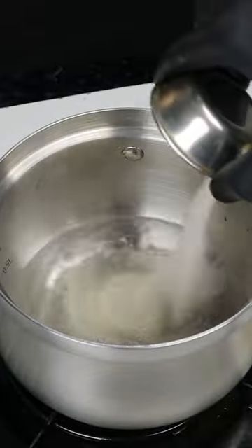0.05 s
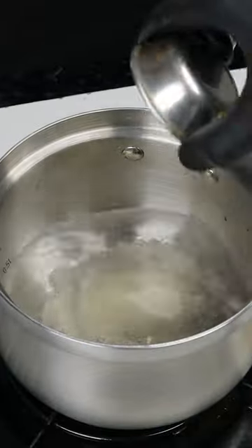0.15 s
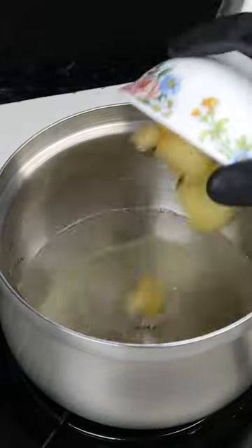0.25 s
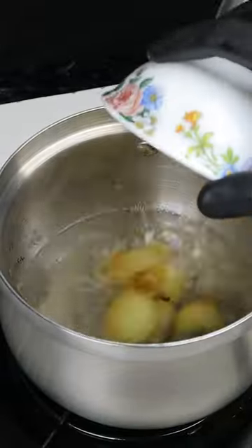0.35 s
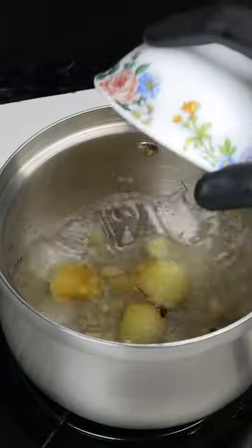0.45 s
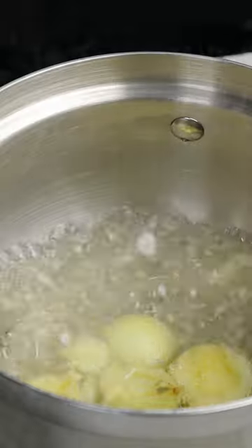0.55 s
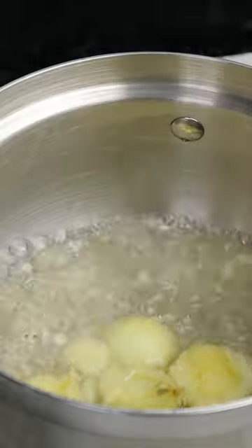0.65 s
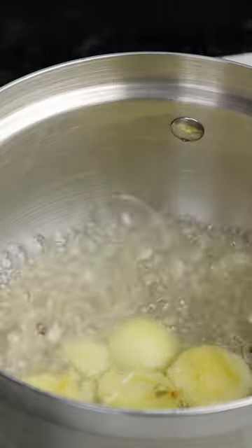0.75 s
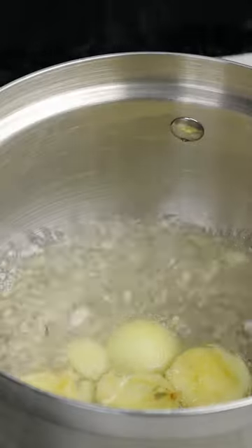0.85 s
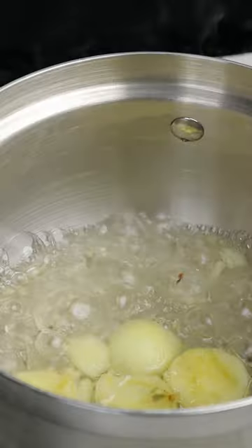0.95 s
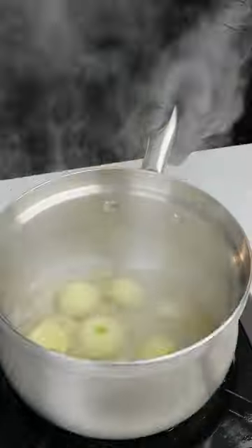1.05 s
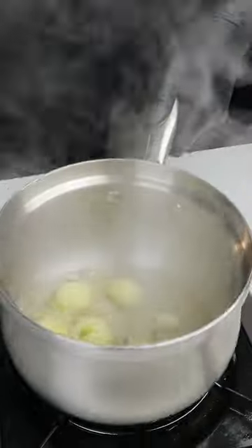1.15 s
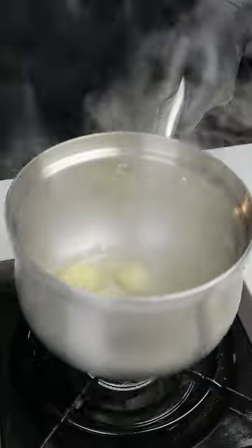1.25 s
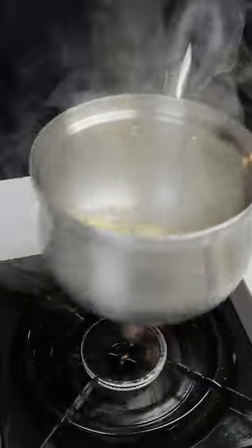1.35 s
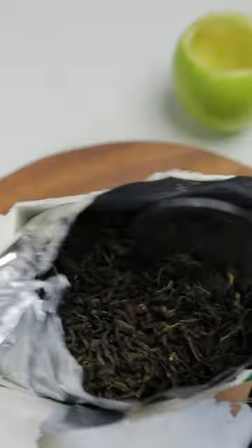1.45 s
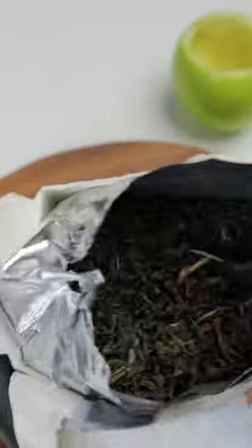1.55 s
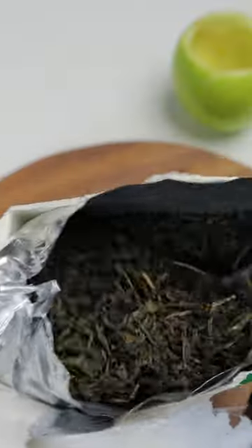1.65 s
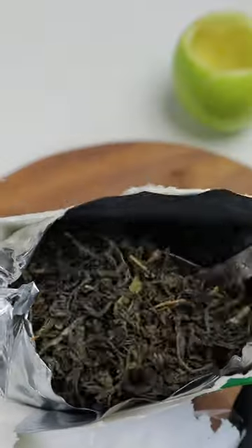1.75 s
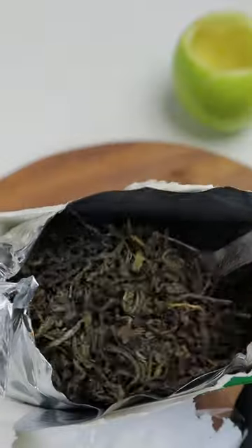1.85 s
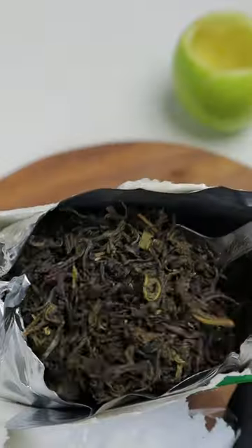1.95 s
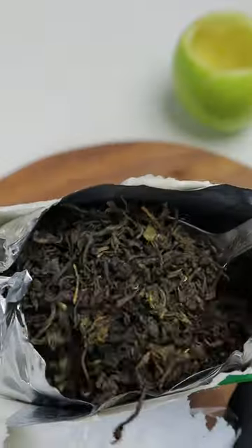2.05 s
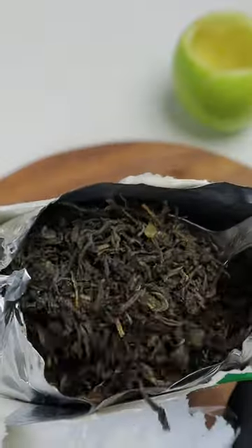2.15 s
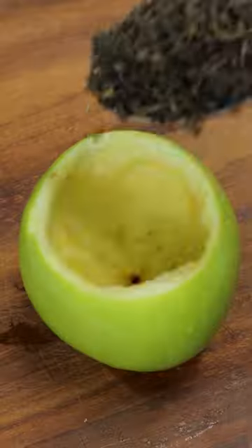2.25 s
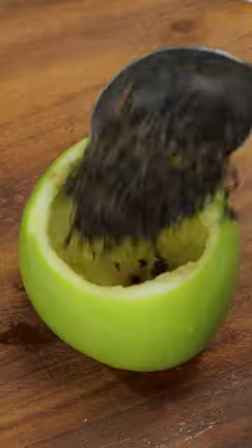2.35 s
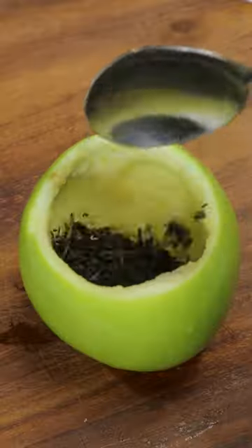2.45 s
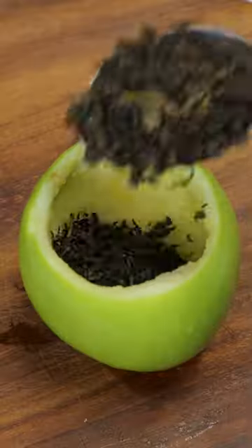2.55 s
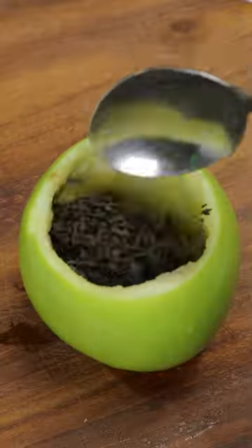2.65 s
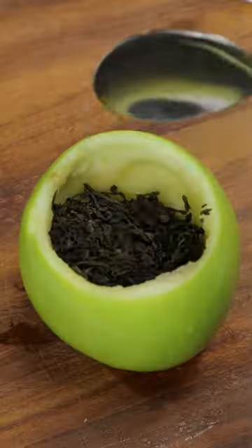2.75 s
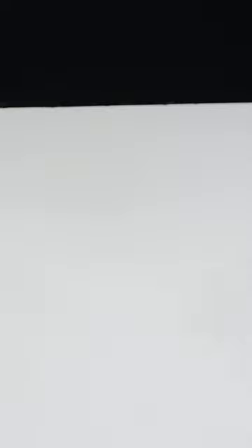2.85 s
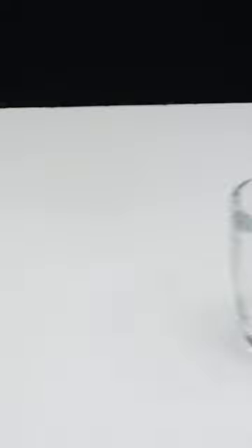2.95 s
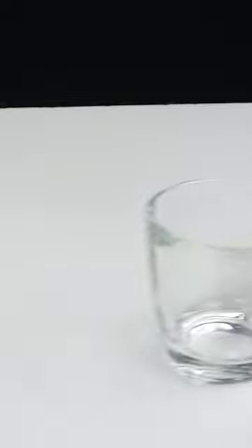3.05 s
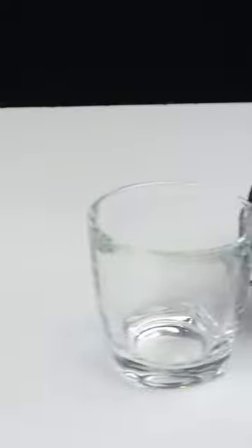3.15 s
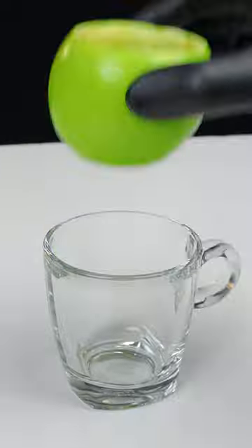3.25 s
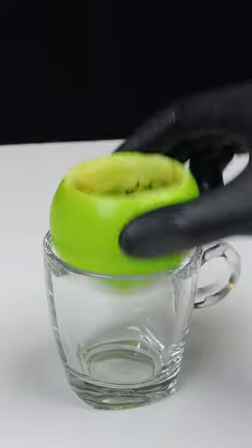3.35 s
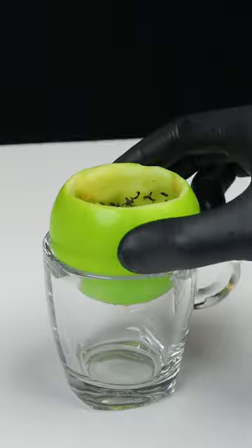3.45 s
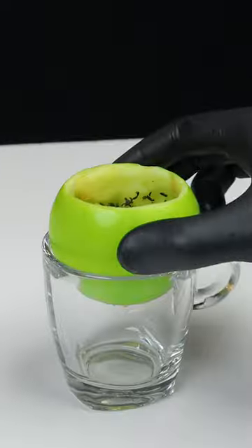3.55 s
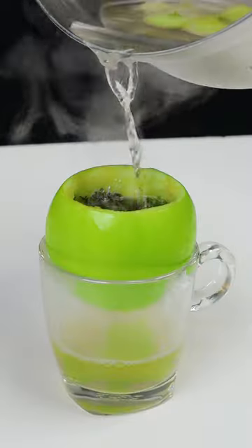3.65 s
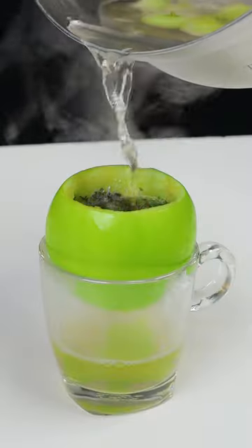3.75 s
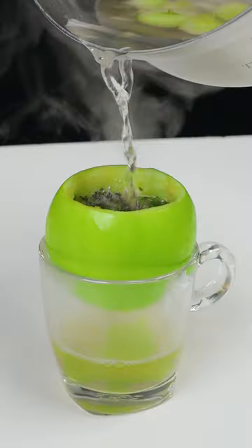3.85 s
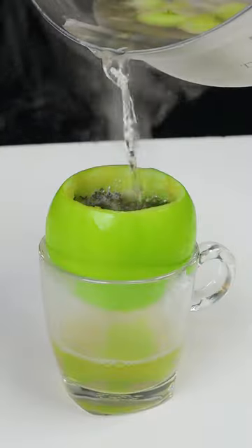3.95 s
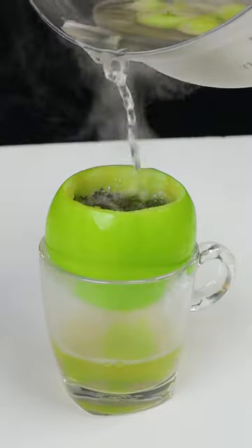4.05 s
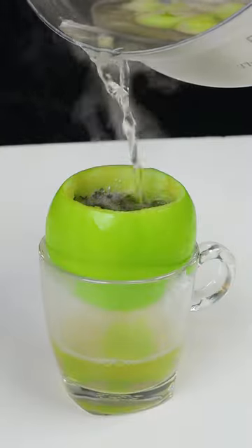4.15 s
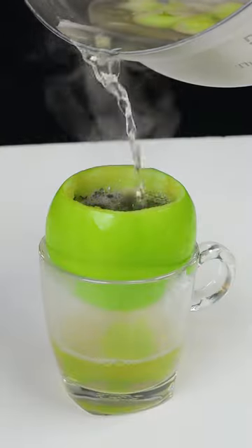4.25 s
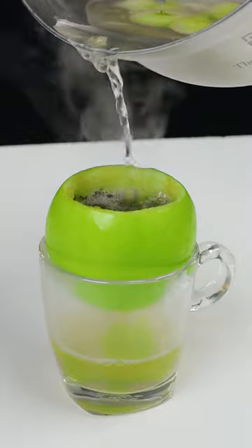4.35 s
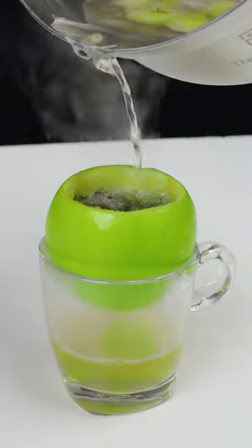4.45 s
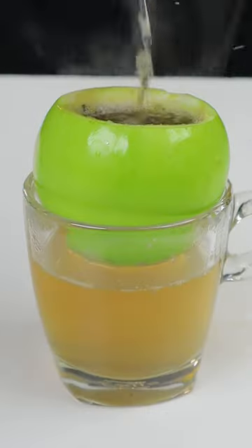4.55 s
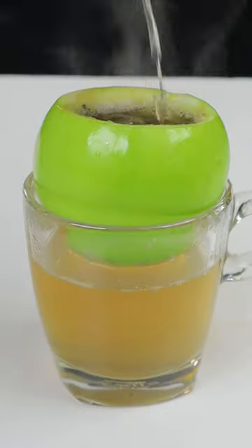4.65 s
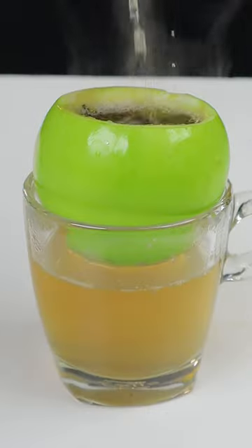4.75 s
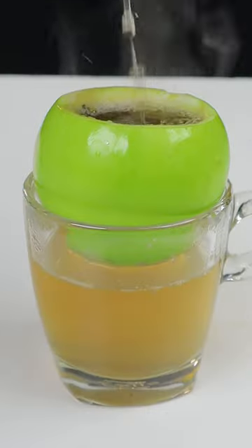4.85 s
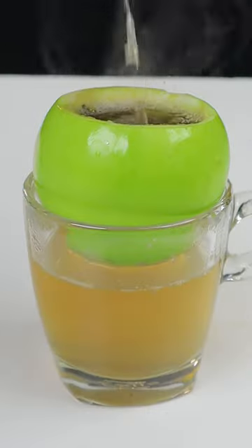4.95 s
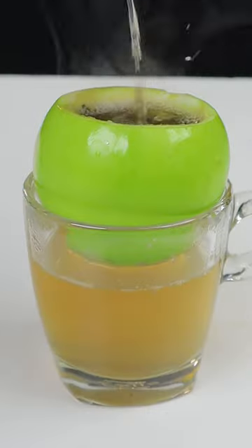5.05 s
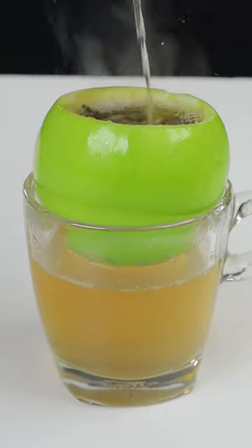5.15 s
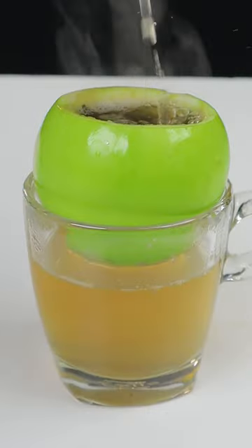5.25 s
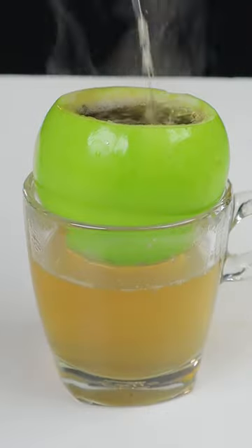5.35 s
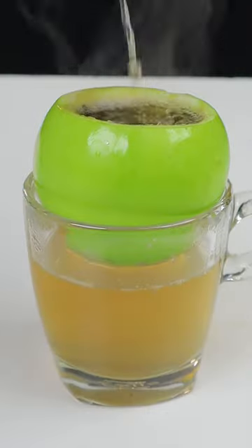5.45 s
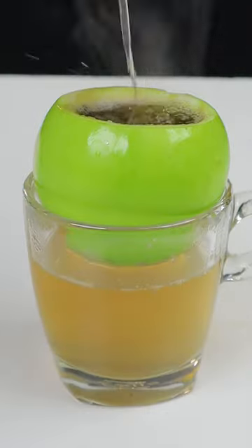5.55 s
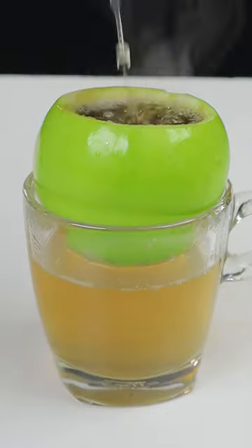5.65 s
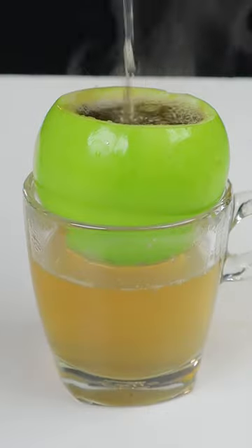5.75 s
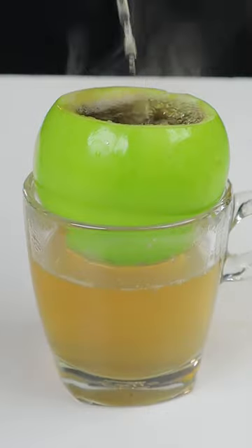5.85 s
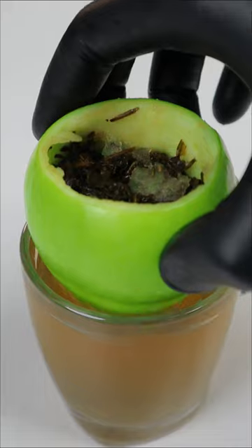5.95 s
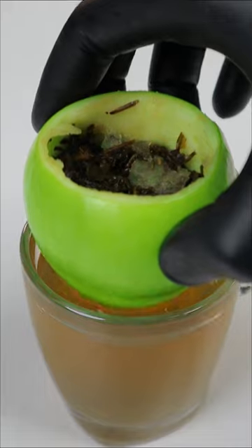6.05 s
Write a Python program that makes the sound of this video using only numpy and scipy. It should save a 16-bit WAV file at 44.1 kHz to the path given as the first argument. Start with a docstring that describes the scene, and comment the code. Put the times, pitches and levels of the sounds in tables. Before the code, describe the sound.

In a quiet kitchen, close and dry, sugar rushes into a steel pot, then fruit plunges in with a splash and low bubbling boil. The pot knocks and scrapes on the hob. Foil crumples and dry tea leaves crunch, snap and sprinkle. A glass rubs across a table, an apple lands with a hard double thud, and water patters brightly onto wet leaves until an abrupt end.

```python
"""Kitchen, close and dry, mono: tea is made in a hollowed apple.
Sugar hisses into a steel pot (dense impacts), fruit plops in, the water boils (ringing bubbles)
and the pot scrapes on the hob. A spoon crunches in a foil bag of tea and sprinkles it; a glass slides,
the apple thuds onto it (resonances), and a thin stream patters on wet leaves (drops and noise).
Every movement is a stroke: attack, hold, release."""
import sys
import numpy as np
from scipy import signal
from scipy.fft import rfft, irfft
from scipy.io import wavfile

SR = 44100
rng = np.random.default_rng(int(sys.argv[2]) if len(sys.argv) > 2 else 0)


def wav_record(signal):
    """Record a signal, one row per channel, as 16-bit PCM in the file named by sys.argv[1]."""
    frames = np.transpose(np.atleast_2d(signal))
    bounded = np.clip(frames, -1, 1)
    # unit amplitude maps onto the largest positive 16-bit level
    quanta = np.round(bounded * 32767).astype(np.int16)
    wavfile.write(sys.argv[1], SR, quanta)


N = 269142

# Stroke tables: t is the time the gain reaches full level.

# Room, output
ROOM_RMS_DB = -77.5
TOP_HZ, END_S = 15900, 5.912

# Boiling water; the gas burns until the boil ends
BOIL_S, BOIL_HOLD_S = 0.443, 0.6504
BOIL_DB, PLUNGE_DB, FIZZ_DB, FLAME_DB = -33, -16.5, -39, -47
# Spectrum of the fine fizz: f/Hz, gain/dB
FIZZ_COLOUR = [(1100, -17.5), (1550, -6.5), (1900, -9), (2900, -5), (4600, -13.5), (8500, -16.5),
               (12000, -14.5), (15500, -26)]
# Spectrum of the boiling bubbles: f/Hz, gain/dB
BOIL_COLOUR = [(30, -16.5), (71, -5), (140, -16), (280, -22), (440, -9.5), (617, -1.5), (780, -4),
               (930, -13.5), (1050, -25), (1800, -57)]
# Spectrum of the splashed spray: f/Hz, gain/dB
SPRAY_COLOUR = [(500, -14.5), (900, -12.5), (1450, -2.5), (1880, -27), (2300, -6.5), (3200, -7),
                (15500, -10.5)]
# Air bubbles ringing in the water, from small bright ticks to deep plops: t/s, level/dB, f/Hz, t60/s
PLOPS = [(.416, -10.5, 3800, 0.008), (.4205, -14, 3790, 0.029), (.438, -9, 652, 0.039),
         (.441, -9.5, 542, 0.045), (.497, -32, 640, .04), (.77, -28, 560, 0.075)]
# Splashes thrown up by the fruit: t/s, hold/s, level/dB
SPLASHES = [(.365, 0.03, -38), (.417, 0.0016, -28), (.435, 0.0056, -16.5), (.45, 0.12, -25)]

# Sugar: a rush that dies down to a thin stream
SUGAR_S, SUGAR_HOLD_S = .061, 0.211
SUGAR_RUSH_DB, SUGAR_RUSH_T60_S, SUGAR_STREAM_DB = -17.5, 0.38, -31
# Spectrum of crystals on steel: f/Hz, gain/dB
SUGAR_COLOUR = [(240, -69), (400, -42), (535, -1.5), (886, -1.5), (1030, -23), (1560, -6), (2060, -21),
                (2550, -2), (15500, 2.5)]
# Hollow notes of the pot as things slide in: t/s, hold/s, level/dB, f/Hz at t, rise/(Hz/s)
HOLLOW_NOTES = [(.082, 0.035, -41, 830, 2095.5), (0.376, 0.025, -47, 873, -600)]

# Hob grate shuddering under the pot
GRATE_S, GRATE_HOLD_S, GRATE_DB = 1.1, .04, -39
# Spectrum of the pot body: f/Hz, gain/dB
POT_COLOUR = [(35, -58), (60, -13.5), (129, -16.5), (327, -40.5), (559, -12.5), (673, -21), (1170, -10.5),
              (1590, -9), (3500, -19), (4740, -9.5), (5320, -29.5), (9740, -25.5), (15500, -36.5)]
# Pot wall modes: f/Hz, width/Hz, gain/dB
POT_MODES = [(1224, 55, 5.5), (1320, 39, 6), (1490, 51, 3.5), (1880, 47, 2), (2120, 39, 0.5),
             (2420, 60, -6), (4710, 95, 2), (6850, 93, -17), (9400, 150, -17), (10600, 80, -16)]
# Pot knocks: t/s, relative level/dB, t60/s
KNOCKS = [(1.2229, -2.5, 0.043), (1.309, -2, 0.056)]
# Shoves of the pot over the hob: t/s, hold/s, level/dB
SCRAPES = [(1.23, .015, -21.5), (1.281, 0.024, -12)]

# Time of the spoon in the bag
SPOON_IN_S, SPOON_HOLD_S = 1.7, 0.566
# Spectrum of crumpling foil: f/Hz, gain/dB
FOIL_COLOUR = [(250, -8), (650, -4.5), (1400, -6.5), (1850, 0.5), (2240, -9.5), (4240, -8), (6200, -17),
               (11600, -18), (15500, -27)]
# Spectrum of the bag's soft bulk: f/Hz, gain/dB
BULK_COLOUR = [(35, -7), (80, 5.5), (165, 2.5), (260, -12.5), (500, -22.5), (1000, -73)]
# Spectrum of the spoon in dry tea: f/Hz, gain/dB
SCOOP_COLOUR = [(500, -34), (780, -13.5), (1100, -15), (1300, -2.5), (2470, -4.5), (3500, -0.5), (5400, 1),
                (6800, -8), (11800, -9.5), (13500, -24)]
# Spectrum of falling leaves: f/Hz, gain/dB
SPRINKLE_COLOUR = [(700, -38), (1100, -30), (1300, -21), (2100, -13), (2800, -18.5), (5400, -9),
                   (15500, 1.5)]
# Foil creases and leaf stems snapping: t/s, peak level/dB, f/Hz
SNAPS = [(1.552, -26, 3000), (1.6609, -3, 10900), (1.6645, -16, 3500), (1.7551, -3, 4300),
         (2.109, -13.5, 5170), (2.224, -8, 4730)]
# Crumples of the foil bag: t/s, hold/s, level/dB
CRUMPLES = [(1.508, 0.019, -27), (1.535, 0.032, -22), (1.575, 0.027, -15), (1.601, 0.022, -8.5),
            (1.665, .001, -14.5), (1.686, 0.048, -22.5), (1.757, .012, -21)]
# Bumps against the bag's bulk: t/s, hold/s, level/dB
BUMPS = [(1.552, 0.014, -10), (1.603, 0.011, -16), (1.67, 0.022, -25.5), (1.78, 0.022, -25),
         (2.0, 0.031, -29.5)]
# Pushes of the spoon through dry tea: t/s, hold/s, level/dB
SCOOPS = [(1.7, 0.071, -21.5), (1.99, 0.12, -27.5)]
# Spoonfuls of leaves falling: t/s, hold/s, level/dB, release/s
SPOONFULS = [(2.506, 0.033, -22.5, 0.11), (2.743, 0.016, -25, .22)]

# Glass at full motion between these times; boom under the thud
GLASS_STARTS_S, GLASS_STOPS_S = 2.874, 3.303
BOOM_S, BOOM_HOLD_S, BOOM_HZ, BOOM_DB = 3.475, 0.16, 53.6, -26.5
# Spectrum of glass rubbing on the table: f/Hz, gain/dB
SLIDE_COLOUR = [(130, -15.5), (450, -14), (610, 6.5), (900, -7), (1500, -6), (4400, -12), (6700, -26),
                (11500, -24), (15000, -39)]
# Modes of the sliding glass: f/Hz, width/Hz, gain/dB
SLIDE_MODES = [(603, 52, -4.5), (1118, 33, 8), (1573, 25, 5.5), (3104, 49, -4)]
# Shoves of the glass over the table: t/s, hold/s, level/dB
SLIDES = [(2.955, 0.069, -26), (3.125, 0.031, -28.5)]
# Apple landing on the glass: t/s, level/dB
THUDS = [(3.459, -30.5), (3.4796, -2), (3.4925, -7)]
# Spectrum of the crushed flesh: f/Hz, gain/dB
THUD_COLOUR = [(100, -4.5), (200, -11), (345, -15.5), (620, 2), (920, -22.5), (1100, -16.5), (3400, -26.5),
               (13000, -57)]
# Modes of glass and table top: f/Hz, level re thud/dB, t60/s
TABLE_MODES = [(171.6, -14.5, 0.151), (572, -11.5, 0.0353), (550, -27.5, 0.28), (625, -22, 0.13),
               (1690, -32.5, .12), (2264, -29.5, .13)]

# Pour: unbroken patter, then a trickle; small drops at random between the big ones
POUR_S, PATTER_HOLD_S, PATTER_DB = 3.65, 0.69, -38.5
TRICKLE_S, TRICKLE_DB = 4.5, -49.5
DRIPS_PER_S, DRIP_DB, DRIP_SPREAD_DB = 12, -34, 13.5
DRIP_HZ, DRIP_OCTAVES, DRIP_TREBLE_DB = 2870, 1.88, -19.5
# Dying froth after each big drop of the trickle, level re drop
FROTH_DB, FROTH_T60_S = -33.5, 0.19
# Big drops on the wet leaves: t/s, level/dB, bubble f/Hz, treble setting/dB (18 dB is added)
DROPS = [(3.639, -30, 2690, -14), (3.658, -22.5, 3240, -19), (3.703, -14, 4900, -30),
         (3.732, -22, 1290, -26), (3.761, -9.5, 3440, -22.5), (3.844, -21, 3540, -44),
         (3.865, -19, 2740, -26.5), (3.916, -20.5, 3020, -31), (3.952, -16.5, 2820, -51),
         (4.082, -17, 5120, -37), (4.041, -19.5, 3450, -26), (4.096, -16.5, 3230, -27),
         (4.146, -7.5, 3370, -27.5), (4.177, -21, 1620, -22.5), (4.22, -12, 2940, -26),
         (4.227, -19, 2470, -25), (4.32, -21.5, 3280, -22), (4.371, -18, 3380, -31),
         (4.424, -20.5, 3300, -29), (4.502, -15, 3550, -13.5), (4.522, -18.5, 2960, -21),
         (4.556, -13, 2820, -11.5), (4.589, -18, 1670, -4.5), (4.637, -22, 3340, -27),
         (4.684, -16.5, 4640, -22), (4.727, -8, 4040, 2), (4.739, -17, 4740, 7), (4.764, -16, 4840, 3),
         (4.846, -11.5, 2810, -15.5), (4.861, -13.5, 1840, -19.5), (4.942, -17, 3750, -27.5),
         (5.14, -22.5, 1850, -20), (5.198, -14.5, 4870, -24), (5.224, -21.5, 1640, -19.5),
         (5.252, -7.5, 3050, -10.5), (5.274, -18.5, 1790, -26), (5.286, -11, 1690, -18),
         (5.353, -7, 1680, -6), (5.371, -14.5, 4900, -26), (5.447, -13, 5160, -23), (5.465, -15, 2870, -32),
         (5.496, -16.5, 3180, -22), (5.559, -11, 2780, -17), (5.587, -12.5, 3030, -14),
         (5.605, -19, 5050, -21), (5.656, -13.5, 1330, -5), (5.776, -9, 2120, -13),
         (5.818, -5, 2290, -20.5), (5.846, -13.5, 3000, -20), (5.878, -9.5, 5200, -10.5),
         (5.904, -23, 2630, -20.5)]
# Spectrum of the patter: f/Hz, gain/dB
PATTER_COLOUR = [(600, -3.5), (850, -2), (1050, -23), (1350, 4), (2200, -5), (3300, 3.5), (5500, 0),
                 (6900, -31), (11000, 2), (15500, -21)]
# Trapped air chirping as the apple fills: t/s, level/dB, f/Hz
GURGLES = [(4.225, -28, 2830), (4.231, -27, 1850), (4.817, -33.5, 1020), (5.039, -27.5, 2910),
           (5.289, -23.5, 1320), (5.496, -31.5, 1150), (5.438, -24, 1245), (5.661, -25, 1243),
           (5.687, -28.5, 2020), (5.779, -28, 2700)]


def amp(db):
    """Decibels to gain."""
    return 10 ** (np.asarray(db) / 20)


def unit(x):
    """Scale to rms 1."""
    return x / np.sqrt(np.mean(x ** 2))


def peak(x, db):
    """Scale to a peak level."""
    return amp(db) * x / np.abs(x).max()


def clock():
    """Time of every sample in seconds."""
    return np.arange(N) / SR


def add(out, s, x):
    """Mix x into out at time s."""
    i = int(np.clip(s * SR, 0, len(out) - 1))
    out[i:i + len(x)] += x[:len(out) - i]


def fade(t60_s):
    """Exponential decay down to -60 dB."""
    return np.exp(-np.log(1000) * np.linspace(0, 1, max(int(t60_s * SR), 8)))


def stroke(s, hold_s, attack_s, release_s):
    """Gain that climbs 60 dB in attack_s to reach 1 at time s, holds, then falls 60 dB in release_s."""
    t = clock() - s
    before = np.maximum(-t / attack_s, 0)
    after = np.maximum((t - hold_s) / release_s, 0)
    return np.exp(-np.log(1000) * np.minimum(before + after, 4))


def strokes(rows, attack_s, release_s):
    """Gain of (t/s, hold/s, level/dB) strokes; the strongest prevails."""
    gains = [amp(db) * stroke(s, hold_s, attack_s, release_s) for s, hold_s, db in rows]
    return np.max(gains, axis=0)


def colour(x, points):
    """Causal minimum-phase filter through (f/Hz, gain/dB) points, steep below the lowest."""
    hz, db = np.transpose(points)
    f = np.maximum(np.arange(2049) * SR / 4096, 1)
    gain = amp(np.interp(np.log(f), np.log(hz), db))
    gain = gain / np.sqrt(1 + (hz[0] / f / 1.3) ** 6)
    # fold the cepstrum onto positive time
    cepstrum = irfft(np.log(gain + 1e-6))
    cepstrum[1:2048] *= 2
    cepstrum[2049:] = 0
    impulse = irfft(np.exp(rfft(cepstrum)))
    return signal.fftconvolve(x, impulse)[:len(x)]


def band(x, lo_hz, hi_hz):
    """Band-pass with edges kept below Nyquist."""
    edges = np.minimum([lo_hz, hi_hz], [.4 * SR, .48 * SR])
    return signal.sosfilt(signal.butter(2, edges, "band", fs=SR, output="sos"), x)


def resonate(x, modes):
    """Sum of (f/Hz, width/Hz, gain/dB) resonances."""
    return sum(amp(db) * signal.lfilter(*signal.iirpeak(hz, hz / width_hz, SR), x)
               for hz, width_hz, db in modes)


def ring(hz, t60_s, glide=0):
    """Damped sine whose pitch rises by the fraction glide, as a bubble's does near the surface."""
    decay = fade(t60_s)
    pitch_hz = np.minimum(hz * (1 + glide * np.linspace(0, 1, len(decay))), SR / 2)
    return decay * np.sin(2 * np.pi * np.cumsum(pitch_hz) / SR)


def burst(t60_s):
    """Noise that dies away."""
    decay = fade(t60_s)
    return decay * rng.standard_normal(SR)[:len(decay)]


def wander(rate_hz):
    """Slow noise of rms 1, clipped to +-2."""
    slow = signal.sosfilt(signal.butter(2, rate_hz, fs=SR, output="sos"), rng.standard_normal(N))
    return np.clip(unit(slow), -2, 2)


def rumble(lo_hz, hi_hz):
    """Band of noise with rms 1."""
    return unit(band(rng.standard_normal(N), lo_hz, hi_hz))


def grains(rate, spread_db):
    """Random tiny impacts, rate per s; positive spread makes strong ones rare, negative weak ones."""
    hit = rng.random(N) < rate / SR
    size = amp(spread_db * np.minimum(rng.exponential(size=N), 4))
    return unit(hit * size * rng.choice([-1, 1], N))


def bubbles(rate, hz, octaves, cycles, spread_db, glide):
    """Steady swarm of ringing bubbles of mixed sizes, rate per s, the loud ones rare."""
    out = np.zeros(N)
    for when, size, strength in rng.random((int(rate * N / SR), 3)):
        pitch_hz = hz * 2 ** (octaves * (size - .5))
        bubble = ring(pitch_hz, cycles / pitch_hz, glide)
        add(out, when * N / SR, amp(spread_db * strength ** 3) * bubble)
    return unit(out)


def room():
    """Faint room rumble: low noise."""
    return amp(ROOM_RMS_DB) * rumble(60, 680)


def flame():
    """Gas hisses through the burner, whose jet whistles faintly; the flame rumbles."""
    gas = rng.standard_normal(N)
    burning = amp(FLAME_DB) * stroke(0, BOIL_S + BOIL_HOLD_S, attack_s=.01, release_s=.06)
    whistle = resonate(gas, [(8450, 190, 10)])
    hiss = unit(band(gas, 3000, 10000) + whistle)
    return (hiss + amp(-17.5) * rumble(63, 190)) * burning


def sugar():
    """Thousands of crystals hit the steel; the air in the pot hums along."""
    rush = amp(SUGAR_RUSH_DB) * stroke(SUGAR_S, hold_s=0.005, attack_s=0.015, release_s=SUGAR_RUSH_T60_S)
    pouring = stroke(SUGAR_S, SUGAR_HOLD_S, attack_s=.03, release_s=0.047)
    flow = np.hypot(rush, amp(SUGAR_STREAM_DB)) * pouring
    out = unit(colour(grains(rate=12000, spread_db=-2.0), SUGAR_COLOUR)) * flow
    waver = amp(3 * wander(40.6))
    for s, hold_s, db, hz, rise_hz_per_s in HOLLOW_NOTES:
        pitch_hz = hz + rise_hz_per_s * (clock() - s)
        note = np.sin(2 * np.pi * np.cumsum(pitch_hz) / SR)
        out += amp(db) * note * waver * stroke(s, hold_s, attack_s=.08, release_s=.16)
    return out


def water():
    """Fruit plunges in with plops and spray; big bubbles boil under a fine fizz."""
    fizzing = amp(FIZZ_DB) * stroke(BOIL_S, BOIL_HOLD_S, attack_s=0.35, release_s=0.13)
    out = unit(colour(grains(rate=5400, spread_db=5.5), FIZZ_COLOUR)) * fizzing
    spray = unit(colour(grains(rate=9400, spread_db=4.0), SPRAY_COLOUR))
    out += spray * strokes(SPLASHES, attack_s=0.0293, release_s=.05)
    boil = bubbles(rate=270, hz=587, octaves=.9, cycles=11, spread_db=2.5, glide=0.089)
    boil += 2.2 * rng.standard_normal(N) * amp(3 * wander(19))
    churn = strokes([(BOIL_S, .004, PLUNGE_DB), (BOIL_S, BOIL_HOLD_S, BOIL_DB)],
                    attack_s=.06, release_s=0.073)
    out += unit(colour(boil, BOIL_COLOUR)) * churn
    for s, db, hz, t60_s in PLOPS:
        # the band-pass delays the onset by a cycle or two
        add(out, s, amp(db) * band(ring(hz, t60_s, glide=0.15), hz / 2, hz * 2))
    return out


def pot():
    """Steel catches and slips on the hob grate; knocks and scraping ring the same wall modes."""
    force = grains(rate=2800, spread_db=-1.5) * strokes(SCRAPES, attack_s=.1, release_s=0.18)
    for s, db, t60_s in KNOCKS:
        add(force, s, amp(db - 5) * burst(t60_s))
    body = unit(colour(force, POT_COLOUR)) + amp(-3.0) * unit(resonate(force, POT_MODES))
    shudder = amp(GRATE_DB) * stroke(GRATE_S, GRATE_HOLD_S, attack_s=.16, release_s=.2)
    return unit(body) * np.std(force) + rumble(45, 110) * shudder


def tea():
    """Foil crumples round the spoon, the bag thumps, dry leaves rustle, snap and fall."""
    foil = unit(colour(grains(rate=6000, spread_db=3.5), FOIL_COLOUR))
    out = foil * strokes(CRUMPLES, attack_s=0.012, release_s=.085)
    bulk = unit(colour(grains(rate=900, spread_db=-3.5), BULK_COLOUR))
    out += bulk * strokes(BUMPS, attack_s=0.11, release_s=.19)
    spoon_in = stroke(SPOON_IN_S, SPOON_HOLD_S, attack_s=0.033, release_s=0.038)
    push = strokes(SCOOPS, attack_s=0.55, release_s=1.06) * spoon_in
    out += unit(colour(grains(rate=6000, spread_db=3.0), SCOOP_COLOUR)) * push
    fall = sum(amp(db) * stroke(s, hold_s, attack_s=0.12, release_s=release_s)
               for s, hold_s, db, release_s in SPOONFULS)
    out += unit(colour(grains(rate=8900, spread_db=5.0), SPRINKLE_COLOUR)) * fall
    for s, db, hz in SNAPS:
        add(out, s, peak(band(burst(0.0051), hz / 1.36, hz * 1.3), db))
    return out


def glass():
    """The glass rubs over the table, then the apple lands on it and both ring briefly."""
    rub = grains(rate=4000, spread_db=2.5)
    out = unit(unit(colour(rub, SLIDE_COLOUR)) + amp(-11.0) * unit(resonate(rub, SLIDE_MODES)))
    moving = stroke(GLASS_STARTS_S, GLASS_STOPS_S - GLASS_STARTS_S, attack_s=0.015, release_s=0.083)
    out *= strokes(SLIDES, attack_s=0.23, release_s=0.3) * moving
    for s, db in THUDS:
        # short crush of the flesh and a faint, longer tail
        push = np.zeros(SR // 4)
        add(push, 0, fade(0.014))
        add(push, 0, amp(-15.0) * fade(0.17))
        crush = colour(push * rng.standard_normal(len(push)), THUD_COLOUR)
        add(out, s, peak(crush, db - 1.0))
        for hz, mode_db, t60_s in TABLE_MODES:
            add(out, s, amp(db + mode_db) * ring(hz, t60_s))
    boom = np.sin(2 * np.pi * BOOM_HZ * (clock() - BOOM_S))
    return out + amp(BOOM_DB) * boom * stroke(BOOM_S, BOOM_HOLD_S, attack_s=.06, release_s=.11)


def drop(hz, treble_db):
    """Contact tick, slap and tiny ringing bubble; the spatter sounds in the hollow the drop has made."""
    body, spray = np.zeros((2, SR // 8))
    add(body, .0012, 0.12 * ring(hz, 2 / hz))
    add(body, .0013, ring(hz, 8 / hz))
    add(body, .0013, 1.02 * ring(hz, 24 / hz, glide=0.045))
    add(body, .0008, 0.27 * burst(0.034))
    add(body, .002, resonate(burst(0.18), [(hz, 330, -12)]))
    add(spray, .0009, burst(0.0044))
    return peak(band(body, 1180, 5900), 0) + peak(band(spray, 3370, 17300), treble_db + 18)


def drips():
    """Small drops of random size and pitch, scattered over the whole pour."""
    out = np.zeros(N)
    pour_s = END_S - POUR_S
    for when, size, depth in rng.random((int(DRIPS_PER_S * pour_s), 3)):
        hz = DRIP_HZ * 2 ** (DRIP_OCTAVES * (depth - .5))
        db = DRIP_DB + DRIP_SPREAD_DB * (size - .5)
        add(out, POUR_S + when * pour_s, peak(drop(hz, DRIP_TREBLE_DB), db))
    return out


def gurgles():
    """Trapped air chirps, and keeps resonating while water runs over it."""
    out = np.zeros(N)
    for s, db, hz in GURGLES:
        add(out, s, amp(db) * band(ring(hz, 36 / hz, glide=0.19), hz / 2, hz * 2))
        add(out, s, resonate(burst(.2), [(hz, 150, db + 2)]))
    return out


def patter():
    """The unbroken stream on the leaves: short bubbles over noise, fading out."""
    level = amp(PATTER_DB) * stroke(POUR_S + 0.068, PATTER_HOLD_S, attack_s=0.44, release_s=.3)
    droplets = bubbles(rate=200, hz=3300, octaves=5.36, cycles=1.3, spread_db=28.5, glide=0)
    return unit(colour(droplets + 0.18 * rng.standard_normal(N), PATTER_COLOUR)) * level


def trickle():
    """A steady trickle of froth and mist; each big drop adds froth that dies away."""
    level = amp(TRICKLE_DB) * (clock() > TRICKLE_S)
    for s, db, _, _ in DROPS:
        if s > TRICKLE_S:
            add(level, s, amp(db + FROTH_DB) * fade(FROTH_T60_S))
    froth = bubbles(rate=380, hz=4980, octaves=2.19, cycles=22.5, spread_db=41.0, glide=0)
    mist = rumble(1070, 14200) * amp(3.4 * wander(59))
    return (unit(band(froth, 2000, 11500)) + amp(-11.5) * mist) * level


def pour():
    """The stream patters on the leaves, then breaks into drops; air gurgles, water burbles down."""
    pouring = stroke(POUR_S, END_S - POUR_S, attack_s=.04, release_s=.05)
    out = drips() + gurgles() + patter() * pouring + trickle()
    for s, db, hz, treble_db in DROPS:
        add(out, s, peak(drop(hz, treble_db), db))
    # bass comes only from water burbling down into the glass
    gulps = bubbles(rate=22, hz=143, octaves=2.16, cycles=21, spread_db=12, glide=.2)
    burble = (amp(-68.5) * gulps + amp(-72) * rumble(46, 490)) * pouring
    return band(band(out, 780, 16000), 760, 19000) + burble


def scene():
    """All sources summed at one close microphone, same signal in both channels."""
    mono = room() + flame() + sugar() + water() + pot() + tea() + glass() + pour()
    return np.array([mono, mono])


def record(dry):
    """The loudest peaks clip, the sound stops dead and the top is cut."""
    sound = np.clip(dry, -1, 1) * (clock() < END_S)
    return signal.sosfilt(signal.ellip(10, .2, 80, TOP_HZ, fs=SR, output="sos"), sound)


dry = scene()
out = record(dry)
wav_record(out)
```